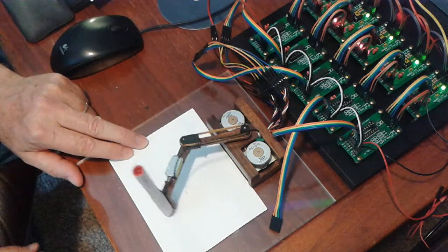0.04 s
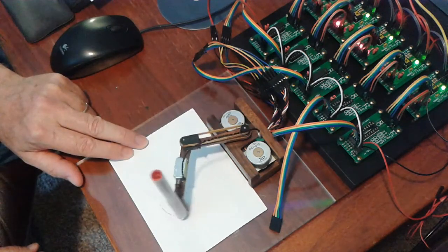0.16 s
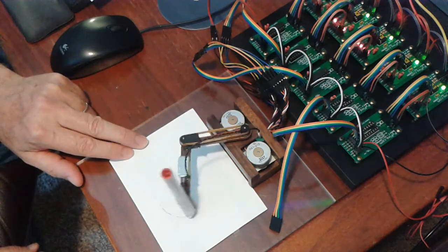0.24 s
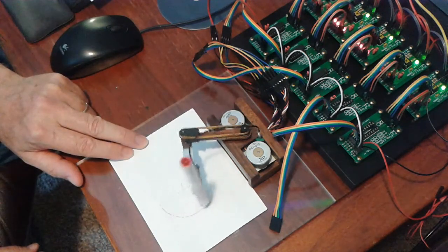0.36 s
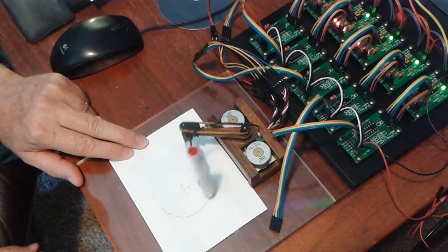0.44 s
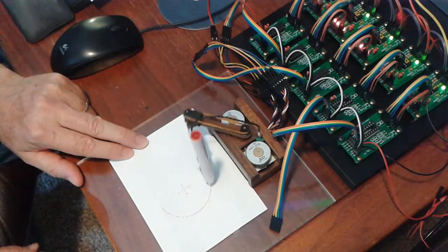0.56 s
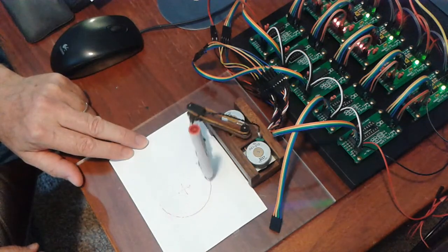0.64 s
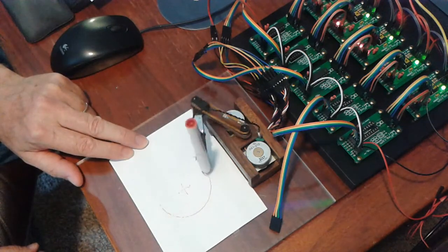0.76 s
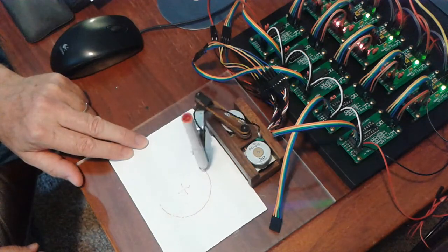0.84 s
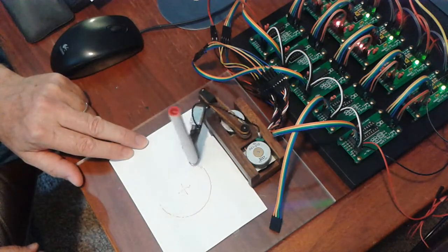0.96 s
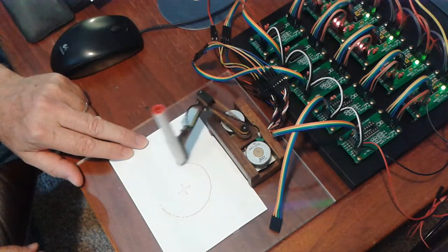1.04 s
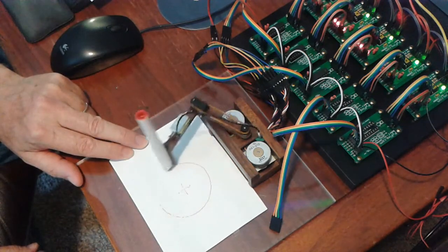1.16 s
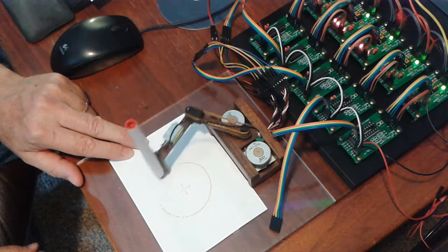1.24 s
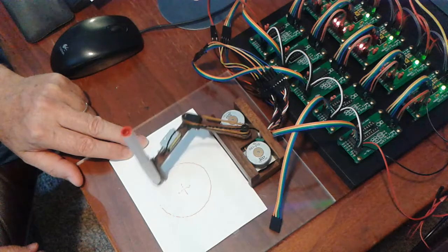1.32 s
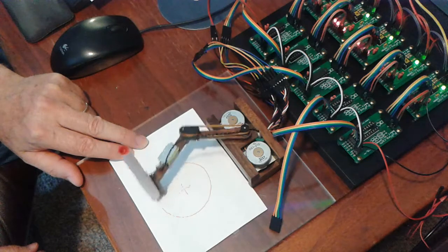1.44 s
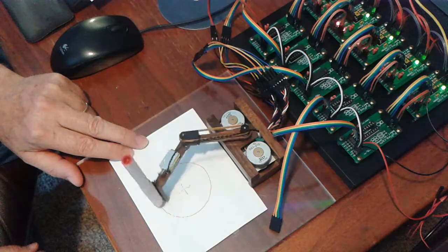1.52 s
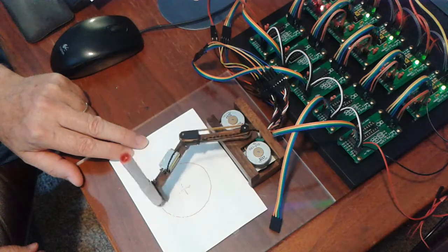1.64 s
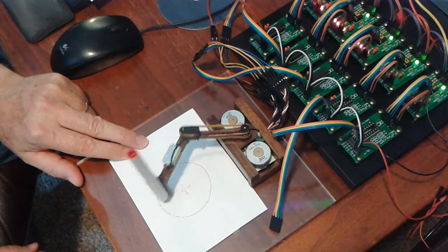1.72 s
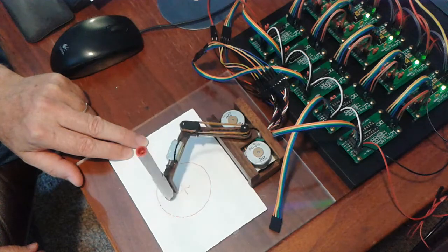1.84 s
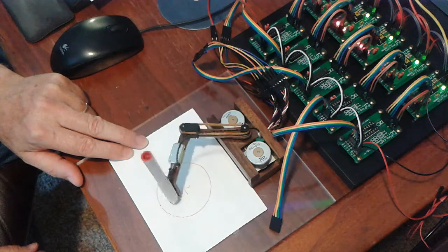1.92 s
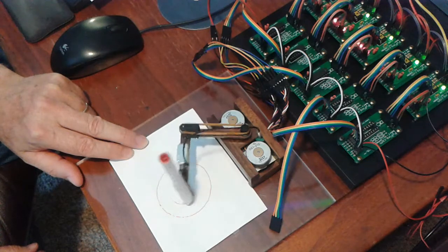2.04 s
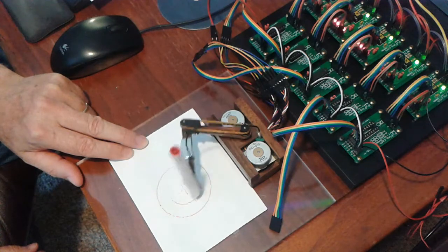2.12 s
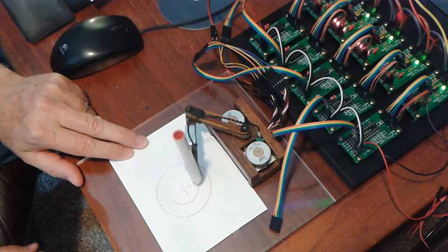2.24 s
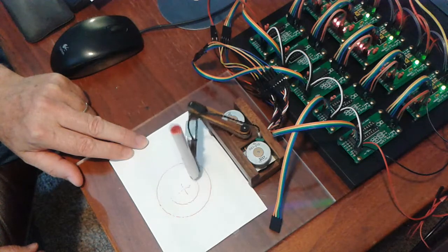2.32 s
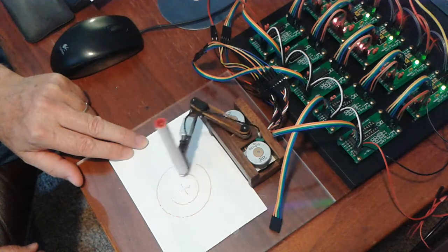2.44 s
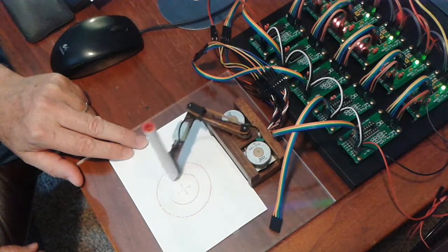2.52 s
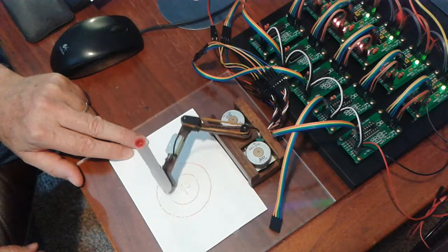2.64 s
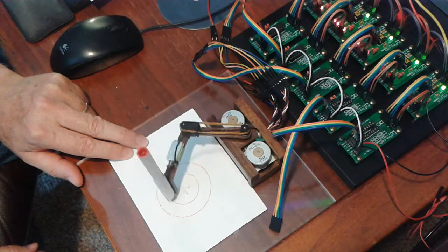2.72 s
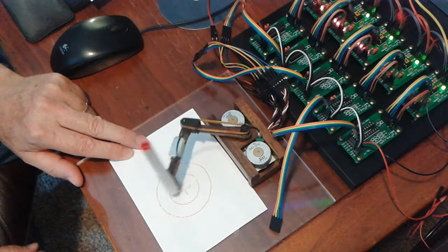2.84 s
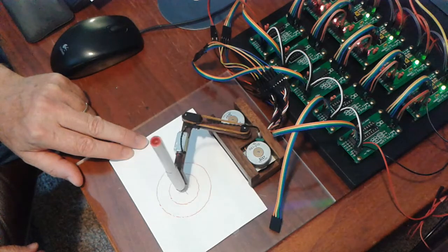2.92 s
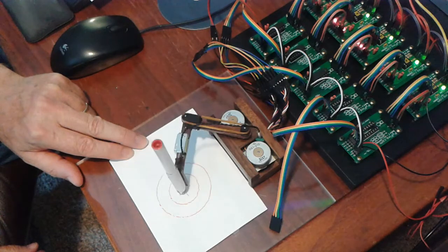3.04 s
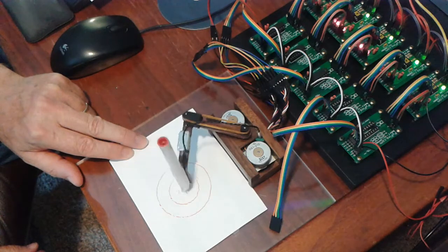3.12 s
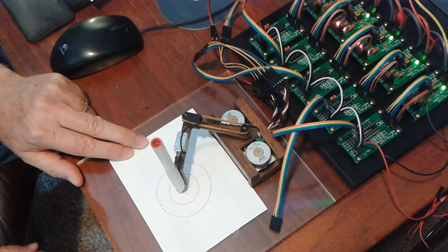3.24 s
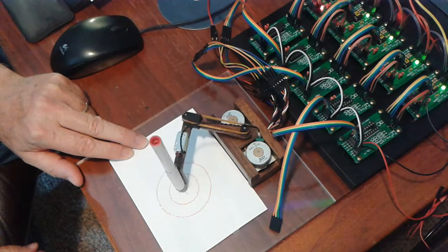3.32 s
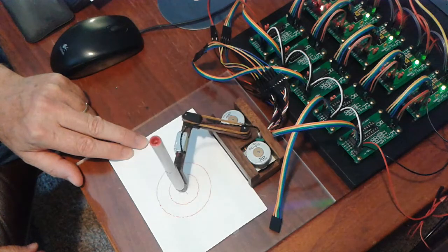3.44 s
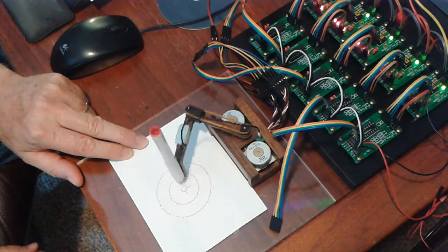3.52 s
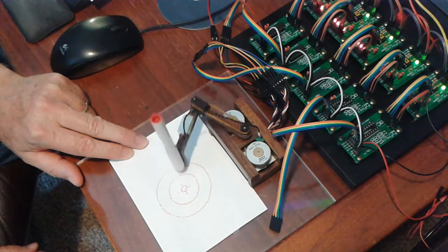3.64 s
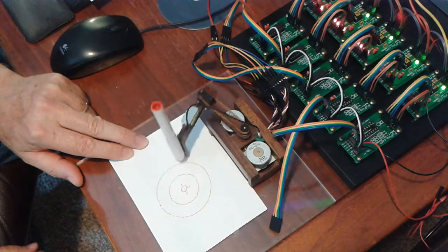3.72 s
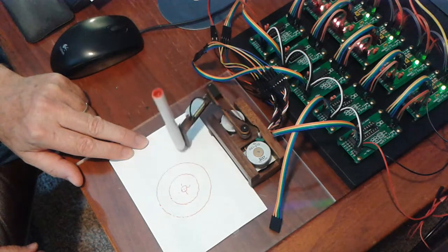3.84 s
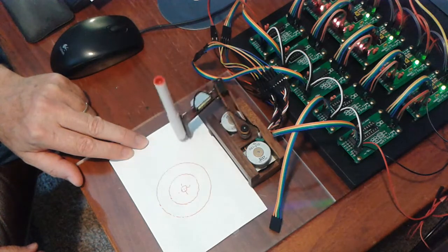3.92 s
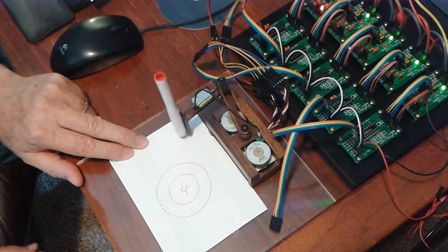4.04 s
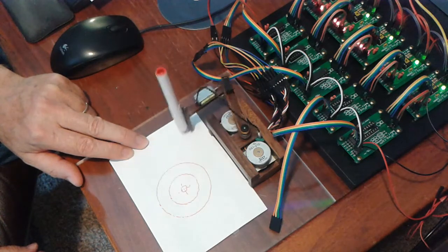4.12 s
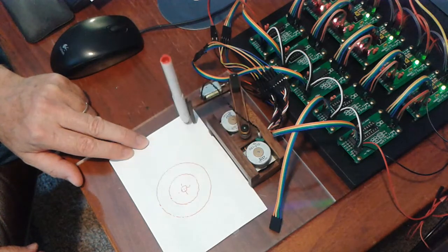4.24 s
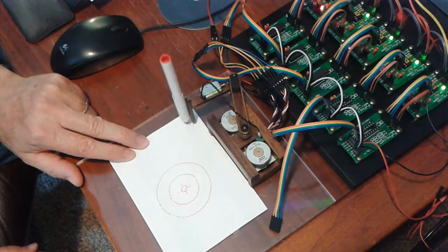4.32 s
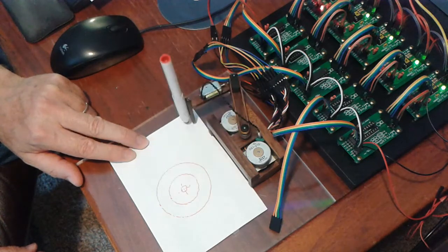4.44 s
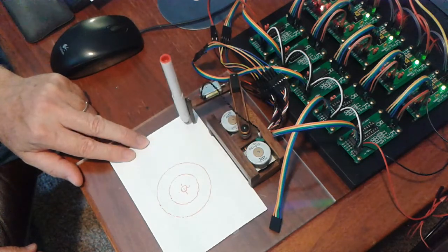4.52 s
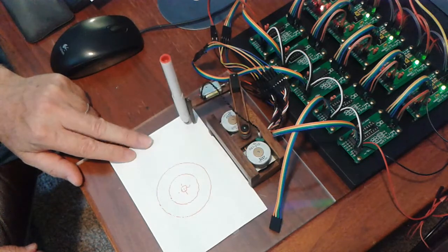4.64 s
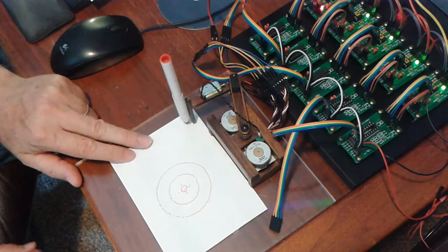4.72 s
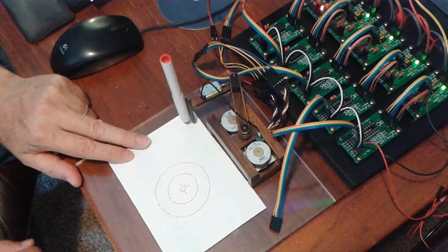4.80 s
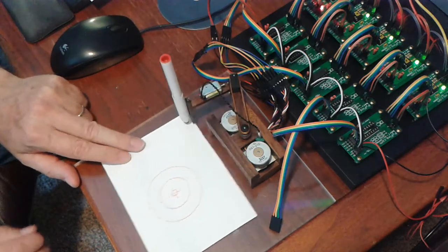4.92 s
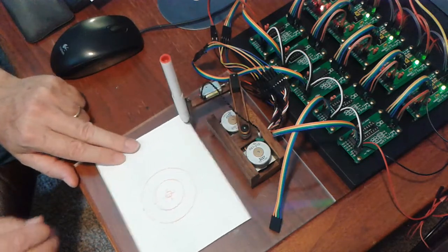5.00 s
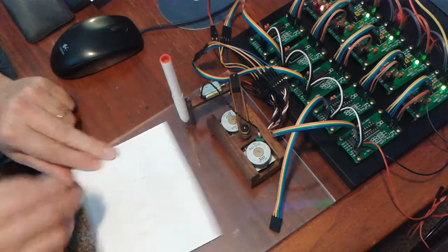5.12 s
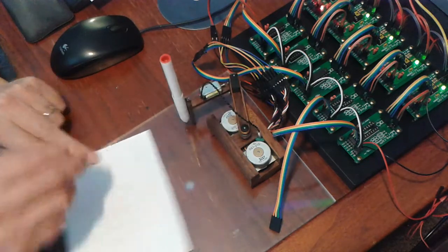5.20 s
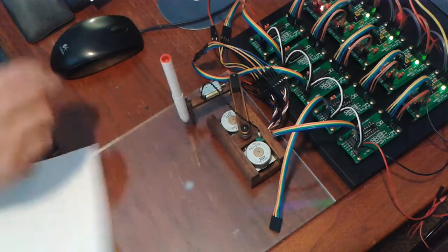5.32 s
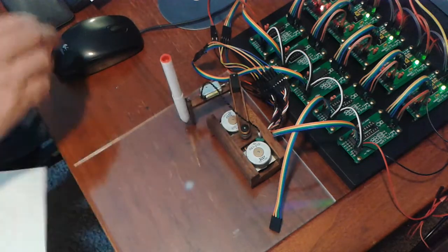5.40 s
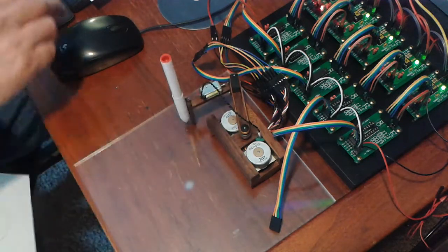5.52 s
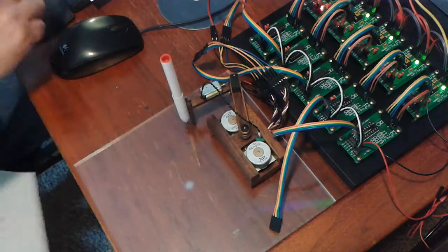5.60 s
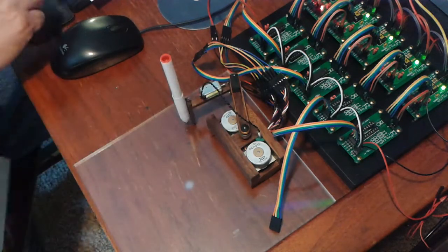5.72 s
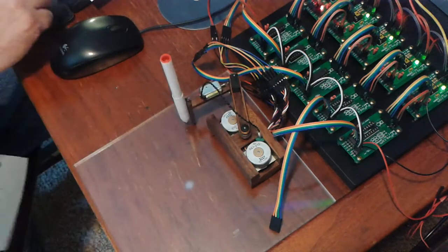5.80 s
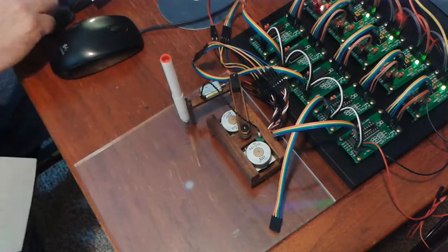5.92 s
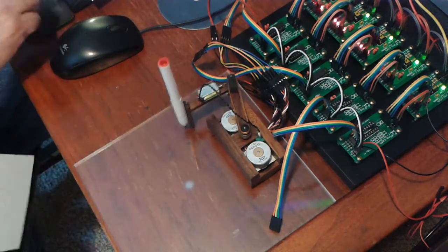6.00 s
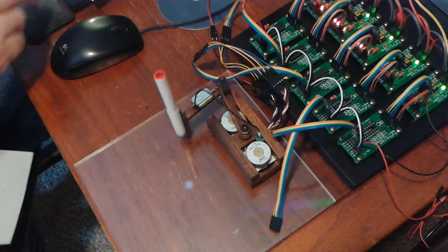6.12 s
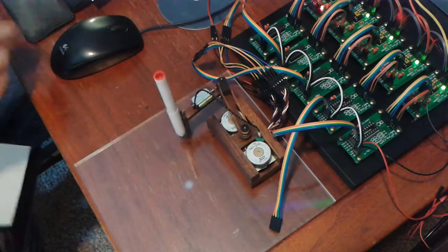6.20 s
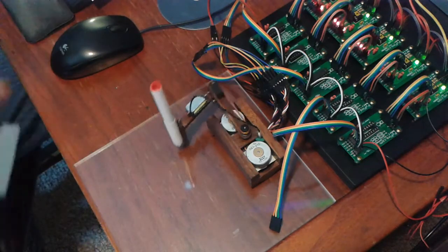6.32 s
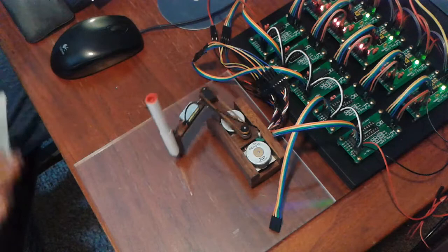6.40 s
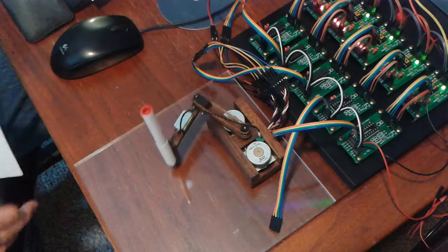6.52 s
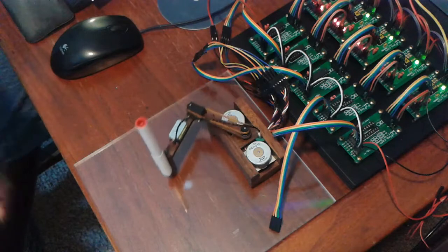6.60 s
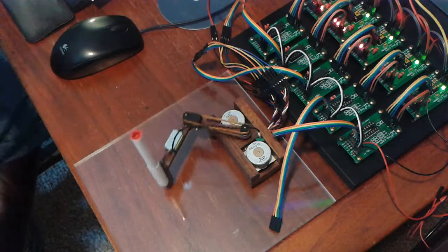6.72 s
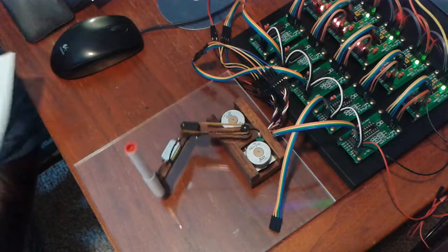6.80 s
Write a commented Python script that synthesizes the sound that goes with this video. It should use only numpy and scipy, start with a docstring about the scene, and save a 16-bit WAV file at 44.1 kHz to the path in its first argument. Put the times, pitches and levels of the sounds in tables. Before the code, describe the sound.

Close on a desk in a quiet room, two small geared stepper motors drive a wooden plotter arm in short, dry, rattling bursts with backlash knocks and faint hum. Hard metallic solenoid snaps punctuate the drawing, with fine pen hiss. The arm stops after four seconds; near-silence, then a sheet of paper crackles and scrapes away with dull bumps. The arm starts rattling again.

```python
"""In a quiet room, two small geared stepper motors swing a wooden plotter arm over a desk.
Chance clicks through the arm's resonances make gear rattle and backlash knocks; wavering sines make coil hum.
A solenoid snaps, a crack and a short ring, as the pen drops and lifts; the pen tip hisses.
The arm stops, a hand pulls the paper away in crackling noise, and the arm restarts.
Behind it lie soft noise and hum; a noise gate lowers the whole sound when all is still."""
import sys
import numpy as np
from scipy import signal
from scipy.fft import rfft, irfft, next_fast_len
from scipy.io import wavfile
from scipy.ndimage import uniform_filter1d

SR = 44100
rng = np.random.default_rng(int(sys.argv[2]) if len(sys.argv) > 2 else 0)


def dump_mix(stems):
    """Bounce the given channels to the path in sys.argv[1] as a 16-bit WAV at rate SR."""
    frames = np.atleast_2d(stems).T  # one column per channel
    limited = np.clip(frames, -1, 1)  # hard clip at full scale
    pcm = np.round(limited * 32767).astype(np.int16)
    wavfile.write(sys.argv[1], SR, pcm)


N = 302526

# Moves of the arm. Each row: start in seconds, length in seconds, rattle drive in dB,
# forearm ring over rattle in dB, upper motor in dB, lower motor in dB.
MOVES = [(-.1, 0.086, -38.5, 4, -52, -56), (0.054, 0.11, -42, 8.5, -57.5, -58),
         (0.174, 0.051, -49.5, -8, -59, -57), (0.244, 0.018, -43, -0.5, -57, -59),
         (0.294, 0.14, -43, -5, -64, -61), (0.43, 0.38, -43.5, -7, -51.5, -61),
         (0.862, 0.123, -40.5, 2.5, -64, -69), (0.99, 0.16, -48, 1, -61.5, -63),
         (1.116, 0.12, -45.5, 6, -58, -54), (1.242, 0.17, -45, 13.5, -53.5, -56.5),
         (1.429, 0.19, -42.5, 6, -54.5, -52.5), (1.767, 0.094, -41, 3.5, -53, -58.5),
         (1.991, 0.047, -39, 5, -56.5, -52), (2.127, 0.19, -42, 5, -60.5, -63.5),
         (2.35, 0.15, -40, -6.5, -53.5, -59), (2.544, 0.12, -42, 7.5, -57, -52),
         (2.686, 0.13, -42.5, 10, -57.5, -49.5), (2.905, 0.096, -40, 11.5, -55, -56.5),
         (3.137, 0.018, -41, 5.5, -68.5, -51.5), (3.195, 0.066, -38.5, 8, -75.5, -60.5),
         (3.29, 0.055, -40, 2.5, -57.5, -49.5), (3.566, 0.27, -45, 4, -52, -58),
         (3.858, 0.19, -41, 3.5, -52.5, -63), (4.19, 0.11, -43, 1.5, -55.5, -78),
         (5.934, 0.027, -46.5, -1, -63, -78), (6.022, 0.02, -49.5, 6, -74, -76),
         (6.079, 0.16, -44.5, 6, -82, -78), (6.329, 0.32, -46, 14, -57.5, -73),
         (6.605, .3, -44, 12, -54, -67)]
# Loudest backlash knocks in the gears. Each row: time in seconds, treble level in dB, body in dB over treble.
KNOCKS = [(0.107, -32, -15), (0.1543, -33.5, 2.5), (0.2992, -39, 7), (0.334, -43, -16),
          (0.3782, -33.5, -12), (0.4124, -36, -17), (0.593, -25, -8), (0.6131, -36.5, 5), (0.873, -31.5, 1),
          (0.8982, -35, 3), (0.9483, -33, 1.5), (0.973, -30, -5), (1.0415, -36, 2), (1.063, -37, -8),
          (1.218, -35.5, 4), (1.238, -45.5, 11), (1.2451, -26, 1), (1.287, -29, -17), (1.3069, -30, -1.5),
          (1.315, -29.5, -2), (1.341, -29.5, -2), (1.408, -29.5, 2), (1.4401, -31, 3), (1.5078, -32, 0),
          (1.5362, -26, 0.5), (1.571, -27.5, -2), (1.6045, -28.5, 2.5), (1.773, -40.5, 8), (1.8024, -33, 0),
          (2.049, -23.5, -8), (2.132, -32, -19), (2.2616, -27, -2), (2.336, -33, 6), (2.43, -24.5, -3),
          (2.5583, -32.5, -4), (2.6042, -26.5, -11), (2.638, -27.5, -6), (2.6674, -32, -6.5),
          (2.73, -31, -9), (2.7468, -21.5, -7.5), (2.805, -22, -4), (2.829, -30, -4), (2.9206, -27, -0.5),
          (2.928, -31, -12), (2.9499, -25, -11.5), (3.131, -40, 9), (3.1456, -46, 10), (3.183, -37.5, 9),
          (3.255, -37.5, 3), (3.2957, -35.5, 0.5), (3.3185, -33, 5.5), (3.5743, -38, 1), (3.591, -37, 5),
          (3.625, -38.5, 3), (3.6593, -34, -4.5), (3.7003, -36, -14), (3.796, -38.5, 0.5),
          (3.859, -38, 3.5), (3.879, -28, -13.5), (3.935, -43, -4), (3.9636, -31.5, -3.5),
          (4.008, -34.5, 6), (4.0289, -32, 6), (4.049, -32, -2.5), (4.058, -42, 6), (4.284, -25, -18.5),
          (5.954, -34.5, -30), (6.1, -36.5, -5), (6.148, -26.5, -6), (6.218, -43.5, 9.5), (6.3457, -40, 6),
          (6.356, -38.5, 8), (6.3734, -30.5, 0), (6.4003, -35.5, 5.5), (6.4875, -33, -13),
          (6.5333, -31.5, -1.5), (6.5688, -35, 4), (6.6005, -36.5, 0.5), (6.6298, -35, 4),
          (6.664, -31, 1.5), (6.6972, -32.5, 1.5), (6.7285, -34.5, 6), (6.759, -32.5, 2.5),
          (6.795, -32, 1.5), (6.83, -29, 0)]
# Broad colour of the rattle. Each row: frequency in Hz, relative level in dB.
ARM_COLOUR = [(88, -44.5), (150, -13.5), (285, -9.5), (381, -12.5), (860, -11), (930, -14), (1910, -14),
              (2180, -7), (2700, -13), (7410, -6.5), (9180, -19), (14100, -38.5), (14800, -60.5)]
# Resonances of the arm. Each row: frequency in Hz, width in Hz, lift in dB.
ARM_MODES = [(2083, 250, 1), (333.3, 40, 7), (498, 14, 6), (658, 52, 5.5), (767.4, 18, 7), (1026, 50, 8.5),
             (1508, 110, 6), (1730, 160, 4.5), (3120, 690, 3), (4040, 60, 5), (4790, 61, 4.5),
             (5780, 64, -2), (6385, 510, 5), (6940, 300, 6), (7200, 2500, 4)]
# Step rates of the upper and lower motor, in Hz.
STEP_HZ = (290.6, 260)
# Short woody groans under load. Each row: start in seconds, length in seconds, pitch in Hz, level in dB.
GROANS = [(0.585, 0.087, 765, -52), (.74, 0.096, 515, -53), (6.725, 0.017, 1050, -45.5)]
# Solenoid snaps, with small ticks before and bounces after.
# Each row: time in seconds, relative level in dB, board echo in dB over the snap.
SNAPS = [(-.03, -3, -6), (1.2385, -27, -9), (1.301, -30, -9), (1.33, -30, -9), (1.434, -28, -9),
         (1.497, -30, -9), (1.6835, -30, -6), (1.7034, -2.8, -9), (1.7465, -23, -6), (1.902, -2.2, -6),
         (1.911, -9, -7), (1.9995, -26, -6), (2.767, -26, -6), (2.8547, -2, -7), (3.0383, -2.2, -4.5),
         (3.048, -12, -7), (3.367, -21, -8), (3.3821, -2.6, -6)]
# Ring of the steel plunger. Each row: frequency in Hz, relative level in dB.
PLUNGER_MODES = [(8180, -1.5), (6090, -17.5), (9850, -23)]
# Echoes from nearby boards. Each row: delay in milliseconds, left level in dB, right level in dB.
SNAP_ECHOES = [(3.0, 0, -15), (3.7, -4, -18), (4.4, -11, -22)]
# Dull bumps on the desk top, the pen's among them.
# Each row: time in seconds, level in dB, pitch in Hz, low thump in dB over the bump.
BUMPS = [(1.706, -41.5, 1240, -28), (1.904, -32.5, 1370, -27.5), (2.856, -44.5, 1990, -30),
         (3.04, -32, 2650, -32), (3.384, -36, 2620, -31.5), (5.354, -38.5, 1004, -27.5),
         (5.554, -47, 910, -23), (5.595, -38, 602, -17.5), (5.936, -39, 1674, -25), (5.955, -37, 900, -12),
         (6.04, -46.5, 476, -0.5), (6.263, -34.5, 634, -34.5), (6.273, -34.5, 1007, -38)]
# Pen hiss at the top. Each row: time in seconds, level in dB before the left-right balance.
PEN_HISS = [(0.0, -55), (0.19, -48.5), (.24, -56), (0.8, -58), (1.53, -50.5), (1.75, -57), (1.89, -61),
            (2.3, -53), (2.42, -49), (2.8, -49.5), (3.02, -68), (3.27, -50), (3.44, -55), (3.56, -89),
            (3.62, -90), (4.06, -61), (4.17, -91), (4.25, -80.5), (4.45, -90.5), (5.9, -81), (5.97, -70),
            (6.2, -71), (6.32, -65), (6.55, -79), (6.67, -53), (6.86, -67)]
# The sheet slides off the desk. Each row: time in seconds, level in dB before trims, low scrape in dB over it.
PAPER_SLIDE = [(5.23, -60.5, -6), (5.292, -62.5, -12), (5.305, -49.5, -25), (5.35, -54, -8),
               (5.376, -59, -14), (5.405, -50, -28), (5.43, -52, -16), (5.44, -43, -28),
               (5.458, -47.5, -22), (5.482, -65, -2), (5.52, -51.5, -13), (5.535, -50, -18),
               (5.556, -50.5, -17), (5.57, -71.5, 14.5), (5.63, -64, -1), (5.65, -51, -13),
               (5.67, -69.5, 4.5), (5.77, -65.5, -2), (5.86, -86, 10)]
# Colour of the rustling sheet. Each row: frequency in Hz, relative level in dB.
SHEET_COLOUR = [(1180, -52), (2000, -17), (4500, -12.5), (6200, -3), (7900, -2.5), (12000, -14.5),
                (14100, -16.5), (14900, -33.5), (15500, -79)]
# Colour of the room noise. Each row: frequency in Hz, relative level in dB.
AIR_COLOUR = [(15, -36.5), (25, -13), (49, -12), (108, -1.5), (194, -4), (253, -3.5), (1010, -12),
              (1190, -10.5), (1970, -17.5), (7860, -19), (14500, -23)]
# Left-right likeness of the room noise. Each row: frequency in Hz, likeness from -1 to 1.
AIR_LIKENESS = [(25, 0.23), (60, 0.61), (180, 0.81), (550, 0.21), (1650, -0.47), (5000, -0.0091)]
# Mains and a fan. Each row: frequency in Hz, typical rms level in dB.
HUM = [(120, -65), (187.6, -69), (1221, -86)]
# Reverberation of the room. Each row: frequency in Hz, time in seconds to fall 60 dB.
ROOM_DECAY = [(200, 0.4), (1000, 0.33), (4000, 0.24), (8000, 0.24), (14000, 0.22)]
# Loudness of the desk at the two ports. Each row: frequency in Hz, left minus right in dB.
ARM_BALANCE = [(290, -1), (700, 1.5), (1200, 2), (2200, -1), (4000, 2), (6200, -10), (7400, 7.5),
               (13000, 16.5)]
# Phase of the desk at the two ports. Each row: frequency in Hz, radians by which left leads.
ARM_LEAD = [(290, 0.58), (700, 0.5), (1200, 0.64), (4000, 1.32), (6200, 1.34), (7400, 4.88), (13000, 2.8)]

# the rattle starts at once and dies fast, then the loose arm settles, quieter and slower
START_S, STOP_DB_PER_S = 0.0024, 605
SETTLE_DB, SETTLE_DB_PER_S = -7, 125
TREBLE_DB = -3  # treble drive of the rattle over its body
# the loose forearm's ring all but stops with the drive; the width is that of one of its two filters
RING_HZ, RING_WIDTH_HZ, RING_SETTLE_DB = 2167, 276, -20.5
LEAD_DB = -17  # a smaller tick runs ahead of each knock
STRIKE_DB = 11  # the hard first contact of a knock, against its rattle
# parts answer a little apart, and a tooth rebounds once
TICK_SLIP_S, REBOUND_S, REBOUND_DB = .001, 0.0055, -2.5
STEP_WAVER = .006  # typical waver of the step rates, as a fraction
HUM_START_S, HUM_STOP_DB_PER_S = 0.024, 295.5  # motor hum swells and fades more softly
AIR_DB = -58.5  # room noise, rms
EDGE_HZ, HISS_EDGE_HZ = 15900, 14600  # top of the whole sound, and of the noises in it


def gears():
    """Teeth chatter in clumps and knock at reversals; wood, gear train and forearm each rattle by themselves."""
    starts, _, level_db, ring_db, _, _ = np.transpose(MOVES)
    level = moving(level_db, START_S, STOP_DB_PER_S)
    ring = moving(level_db + ring_db, START_S, STOP_DB_PER_S, settle_db=RING_SETTLE_DB)
    shared = catches(per_s=170, tau=0.0024, depth=0.9)  # teeth catch unevenly
    parts = []
    for gain in (level * amp(-2.5), level, level * amp(TREBLE_DB), ring):
        own = catches(per_s=150, tau=0.00065, depth=4.0)
        parts.append(gain * shared * own * grit(per_s=6000, spread_db=3))
    # the heavy wood growls more steadily
    parts[0] = parts[0] + level * amp(-0.5) * grit(per_s=9000, spread_db=-1.0)
    add_knocks(parts, starts, ring_db)
    wood, body, bright, loose = parts

    hz = np.fft.rfftfreq(8192, 1 / SR)
    lift_db = sum(db / (1 + (2 * (hz - f) / width) ** 2) for f, width, db in ARM_MODES)
    arm = causal(read(ARM_COLOUR, hz) + lift_db)
    growl = signal.oaconvolve(split(wood, 1336)[0], arm)[:N]
    train = band(body, 1226, 4390) + split(bright, 5610)[1]
    rattle = signal.oaconvolve(train, arm)[:N]
    b, a = signal.iirpeak(RING_HZ, RING_HZ / RING_WIDTH_HZ, SR)
    forearm = signal.lfilter(b, a, signal.lfilter(b, a, loose))
    whole = rattle + growl + forearm
    # as the arm folds and the teeth load, the colour shifts; each port hears its own patches
    return np.array([shifting(whole, depth_db=2.5, turn=.4) for _ in range(2)])


def add_knocks(parts, starts, ring_db):
    """Backlash closes with a faint early tick, a hard contact with a short rattle, and one rebound."""
    t = np.arange(1300) / SR
    fade = 2.0 * np.exp(-t / 0.001) + 0.83 * np.exp(-t / 0.0046)  # a tick, then a short rattle
    shape = (1 - np.exp(-t / 0.00054)) ** 2 * fade
    strike = amp(STRIKE_DB) * signal.unit_impulse(len(t), idx=20)

    def chatter():
        return rng.standard_normal(len(t)) * shape

    for s, db, body_db in KNOCKS:
        # the forearm answers more where it is loose
        loose_db = .5 * ring_db[np.searchsorted(starts, s + REBOUND_S) - 1]
        answers_db = (body_db - 18, body_db - 0.5, 0, body_db + loose_db - 1.0)
        for part, part_db in zip(parts, answers_db):
            slip, wait, size, early = rng.random(4)
            peak_db = db + part_db
            add(part, s - REBOUND_S * early, amp(peak_db + LEAD_DB) * chatter())
            add(part, s + TICK_SLIP_S * slip, amp(peak_db) * (chatter() + strike))
            add(part, s + REBOUND_S * (.5 + wait), size * amp(peak_db + REBOUND_DB) * chatter())


def moving(db, start_s, stop_db_per_s, settle_db=SETTLE_DB):
    """Gain over time: each move rises, holds its level, drops and settles."""
    t, power = np.arange(0, N, 32) / SR, 0
    for (s, length, *_), level_db in zip(MOVES, db):
        rise = np.clip((t - s) / start_s, 0, 1)
        after = np.maximum(t - s - length, 0)
        fall_db = np.maximum(-stop_db_per_s * after, settle_db - SETTLE_DB_PER_S * after)
        power = power + (rise * amp(level_db + fall_db)) ** 2
    return np.interp(np.arange(N) / SR, t, np.sqrt(power))


def coils():
    """Each motor hums at its step rate, unsteady in pitch and level, with a weak octave."""
    out = np.zeros(N)
    for hz, db in zip(STEP_HZ, np.transpose(MOVES)[4:]):
        turn = 2 * np.pi * np.cumsum(hz * (1 + STEP_WAVER * drift(8))) / SR
        tone = np.sin(turn) + amp(-15.5) * np.sin(2 * turn)
        flutter = amp(2.9 * drift(50))
        out += moving(db, HUM_START_S, HUM_STOP_DB_PER_S) * flutter * tone
    return out


def groans():
    """Now and then the loaded wood groans: one pitch that swells and fades."""
    t, out = np.arange(N) / SR, np.zeros(N)
    for s, length, hz, db in GROANS:
        swell = np.sin(np.pi * np.clip((t - s) / length, 0, 1))
        out += amp(db) * swell * np.sin(2 * np.pi * hz * t)
    return out


def solenoid():
    """A steel plunger cracks and rings for a millisecond or two; boards close by and the room throw it back."""
    t = np.arange(200) / SR
    lead = SR // 10  # room for a snap before the start, whose tail is still heard
    ring = sum(amp(db) * np.sin(2 * np.pi * hz * t) for hz, db in PLUNGER_MODES)
    ring *= (t / .00021) ** 3 * np.exp((.00063 - t) / .00021)
    ring /= abs(ring).max()
    click = signal.unit_impulse(len(t), idx=24)
    crack = amp(4.0) * band(click, 8100, 22000) + amp(-7.5) * band(click, 1400, 9500)
    snap = ring + crack

    direct, thrown = np.zeros((2, N + lead))
    for s, db, echo_db in SNAPS:
        add(direct, s + lead / SR, amp(db) * snap)
        add(thrown, s + lead / SR, amp(db + echo_db) * snap)
    # the tail shifts in colour, so no two are alike
    tail = np.array([shifting(ear, depth_db=3.5, turn=0) for ear in room(thrown, start=0.0036)])
    out = amp(-1.5) * dulled(tail) * amp([[0.5], [-3]])
    out += np.array([late(direct, 1.4), amp(-4.5) * direct])
    for ms, *ears_db in SNAP_ECHOES:
        add(out, ms / 1000, amp(ears_db)[:, None] * thrown)
    return out[:, lead:]


def bumps():
    """A dull clatter round one woody pitch, over a low push through the desk."""
    t, out = np.arange(4000) / SR, np.zeros(N)
    for s, db, hz, low_db in BUMPS:
        chance = rng.standard_normal(len(t))
        pitch = amp(-3.5) * np.sin(2 * np.pi * hz * t)
        clatter = amp(-5.5) * evened(band(chance, hz * 0.32, hz * 2.5))
        contact = amp(0.5 - 60 * t / 0.0091) * chance
        ring = (pitch + clatter + contact) * amp(-60 * t / 0.039)
        push = amp(low_db - 60 * t / 0.16) * np.sin(2 * np.pi * 102 * t)
        add(out, s, amp(db) * (ring + push) * (1 - np.exp(-t / 0.0026)))
    return out


def pen():
    """A fine hiss at the top, as of the tip on paper, unlike in the two ears; it catches unevenly."""
    (level_db,), _ = curves(PEN_HISS)
    hiss = np.array([evened(band(grit(per_s=5200, spread_db=3.5), 8000, 15000)) for _ in range(2)])
    return amp(level_db) * catches(per_s=22, tau=0.006, depth=4.0) * hiss * amp([[2.5], [-2.5]])


def paper():
    """The sheet crackles in a bright hiss as it catches, with a dull scrape on the desk."""
    (level_db, low_db), on = curves(PAPER_SLIDE)
    hz = np.fft.rfftfreq(2048, 1 / SR)
    crackle = grit(per_s=11000, spread_db=2.5) * catches(per_s=180, tau=0.0027, depth=1.9)
    rustle = signal.oaconvolve(crackle, causal(read(SHEET_COLOUR, hz)))[:N]
    below = split(grit(per_s=6800, spread_db=3.5), 1710)[0]
    scrape = evened(split(below, 277)[1])
    return on * amp(level_db - 4.5) * (rustle + amp(low_db) * scrape)


def air():
    """Room noise, most alike in the two ears in the bass, and hum that wavers in level."""
    frames, hz = N // 512 + 5, np.fft.rfftfreq(2048, 1 / SR)
    a, b, c, d = rng.standard_normal((frames, 1025, 4)).T
    left, other = a + 1j * b, c + 1j * d
    same = np.clip(read(AIR_LIKENESS, hz), -1, 1)[:, None]
    right = same * left + np.sqrt(1 - same ** 2) * other
    colour = amp(read(AIR_COLOUR, hz)) * (hz < HISS_EDGE_HZ)
    z = np.array([left, right]) * colour[:, None]
    noise = amp(AIR_DB) * evened(signal.istft(z, nperseg=2048, noverlap=1536)[1][:, :N])
    t, hum = np.arange(N) / SR, 0
    for f, db in HUM:
        level = np.sqrt(2) * amp(db + 2.1 * drift(5.9))  # a sine peaks at root two over its rms
        hum = hum + level * np.sin(2 * np.pi * (f * t + rng.random()))
    return noise + hum


def room(x, start):
    """Sparse reflections of random sign, each band dying at its own speed, other ones in each ear."""
    taps = np.zeros((2, SR // 2))
    slots = np.arange(int(start * SR), SR // 2 - 20, 20)
    at = slots + rng.integers(0, 20, (2, len(slots)))
    np.put_along_axis(taps, at, rng.choice([-1., 1.], (2, len(slots))), 1)
    hz, t, z = signal.stft(taps, SR, nperseg=256)
    decay = amp(-60 * t / read(ROOM_DECAY, hz)[:, None])
    tail = signal.istft(z * decay, SR, nperseg=256)[1]
    tail = tail / np.linalg.norm(tail[0])
    return signal.fftconvolve(x[None], tail, axes=1)[:, :x.shape[-1]]


def ports(pair):
    """Two microphone ports hear the desk with different level and phase at each frequency."""
    n = next_fast_len(N)
    hz = np.fft.rfftfreq(n, 1 / SR)
    half = amp(read(ARM_BALANCE, hz) / 2) * np.exp(.5j * read(ARM_LEAD, hz))
    return irfft(rfft(pair, n) * np.array([half, 1 / half]), n)[:, :N]


def shifting(x, depth_db, turn, hop=64):
    """Colour and phase (turn in radians) shift in patches a few hundred Hz wide; the overall level stays."""
    z = signal.stft(x, nperseg=4 * hop, noverlap=3 * hop)[2]

    def patches(frames):
        chance = rng.standard_normal(z.shape[::-1]).T
        return evened(uniform_filter1d(uniform_filter1d(chance, size=5, axis=0), size=frames, axis=1))

    colour, phase = patches(8), patches(40)  # the phase moves more slowly
    z = z * amp(depth_db * colour) * np.exp(1j * turn * phase)
    out = signal.istft(z, nperseg=4 * hop, noverlap=3 * hop)[1][:len(x)]
    return evened(out) * np.std(x)


def catches(per_s, tau, depth):
    """Sudden swells that die away over tau seconds, on a steady base; rms 1."""
    kicks = rng.random(N) * (rng.random(N) < per_s / SR)
    return evened(1 + depth * signal.lfilter([1], [1, -np.exp(-1 / (tau * SR))], kicks))


def grit(per_s, spread_db):
    """Random clicks of either sign, their sizes spread by chance; rms 1."""
    size_db = spread_db * np.minimum(rng.exponential(1, N), 5)
    size = amp(size_db) * rng.choice([-1., 1.], N)
    return evened(size * (rng.random(N) < per_s / SR))


def drift(rate):
    """Slow chance: straight lines between random knots of rms about 1, rate knots a second."""
    knots = rng.standard_normal(int(N / SR * rate) + 3)
    return np.interp(np.arange(N) / SR * rate, np.arange(len(knots)), knots)


def causal(gain_db):
    """Shortest causal (minimum-phase) response with the given colour over the bins 0..SR/2, energy 1."""
    log = np.log(amp(np.maximum(gain_db, -100)))
    full = np.r_[log, log[-2:0:-1]]
    taps = np.fft.ifft(np.exp(np.conj(signal.hilbert(full)))).real[:len(log)]
    return taps / np.linalg.norm(taps)


def dulled(x):
    """Roll the sound off at the top edge of the hiss."""
    return signal.oaconvolve(x, signal.firwin(255, HISS_EDGE_HZ, window=("kaiser", 8), fs=SR)[None], "same")


def split(x, hz):
    """The sound below and above a frequency."""
    low = signal.sosfilt(signal.butter(4, hz, fs=SR, output="sos"), x)
    return low, signal.sosfilt(signal.butter(4, hz, "high", fs=SR, output="sos"), x)


def band(x, lo_hz, hi_hz):
    """The sound between two frequencies."""
    return signal.sosfilt(signal.butter(3, [lo_hz, hi_hz], "band", fs=SR, output="sos"), x)


def late(x, samples):
    """Delay by a fraction of a sample or more, through a phase slope."""
    n = next_fast_len(len(x))
    return irfft(rfft(x, n) * np.exp(-2j * np.pi * np.fft.rfftfreq(n) * samples), n)[:len(x)]


def curves(table):
    """Columns of a table over time, and a softened switch that is 1 inside it."""
    t, rows = np.arange(N) / SR, np.array(table)
    on = ((t >= rows[0, 0]) & (t <= rows[-1, 0])) * 1.
    return [np.interp(t, rows[:, 0], column) for column in rows.T[1:]], uniform_filter1d(on, 200)


def read(points, hz):
    """Value of a table at each frequency, on a log frequency scale."""
    f, value = np.transpose(points)
    return np.interp(np.log(hz + 1), np.log(f + 1), value)


def add(mix, s, sound):
    """Lay a sound into the mix at s seconds, cut at both ends of the mix."""
    at = round(s * SR)
    sound = sound[..., max(-at, 0):]
    part = mix[..., max(at, 0):][..., :sound.shape[-1]]
    part += sound[..., :part.shape[-1]]


def amp(db):
    """Decibels to amplitude."""
    return 10 ** (np.asarray(db) / 20)


def evened(x):
    """Scale to rms 1."""
    return x / np.sqrt(np.mean(x ** 2) + 1e-20)


def scene():
    """Arm and desk through the two ports, then pen, paper, solenoid and room noise."""
    rattle, sheet = gears() + bumps(), paper()
    reflected = amp(-8.0) * room(rattle.mean(0), start=.001)
    desk = ports(rattle + reflected + coils() + groans())
    hand = amp(1.5) * sheet * amp([[1.5], [-1.5]]) + amp(2.5) * room(sheet, start=0.00033)
    return dulled(desk + pen() + hand) + solenoid() + air()


def record(dry):
    """A noise gate opens quickly on sound and closes slowly in the quiet; then the band limit."""
    power_db = 10 * np.log10(abs(uniform_filter1d((dry ** 2).mean(0), 800)) + 1e-12)
    fall = np.arange(N) * 170.0 / SR  # the held level falls 170 dB a second
    held_db = np.maximum.accumulate(power_db + fall) - fall
    cut_db = np.clip(0.91 * (held_db + 45.5), -13, 0)  # cuts below -45.5 dB, by 13 dB at most
    gated = dry * amp(uniform_filter1d(cut_db, 600))
    return signal.oaconvolve(gated, signal.firwin(767, EDGE_HZ, window=("kaiser", 9), fs=SR)[None], "same")


dry = scene()
out = record(dry)
dump_mix(out)
```